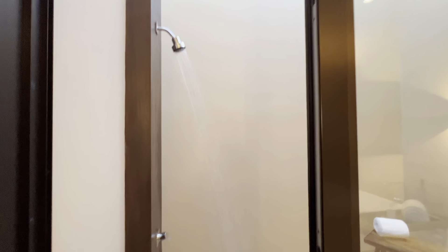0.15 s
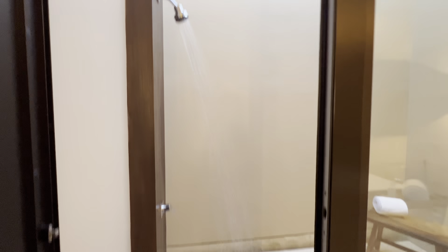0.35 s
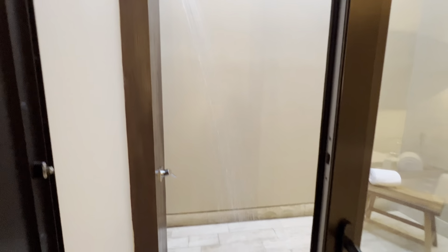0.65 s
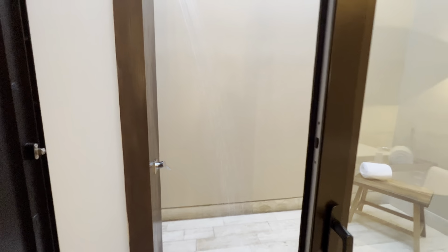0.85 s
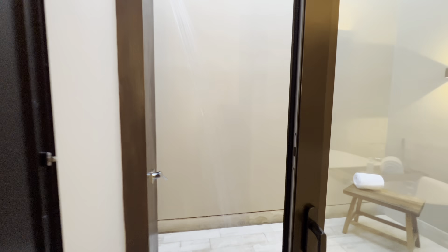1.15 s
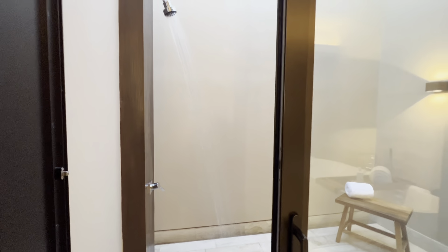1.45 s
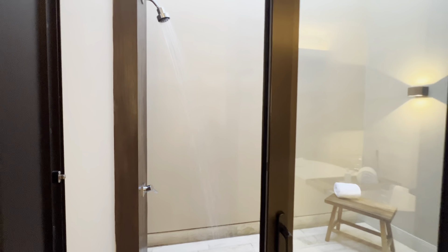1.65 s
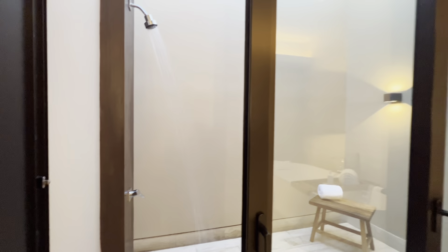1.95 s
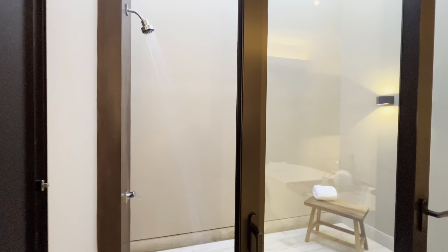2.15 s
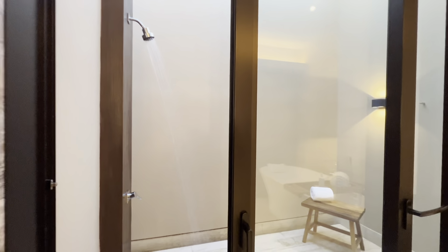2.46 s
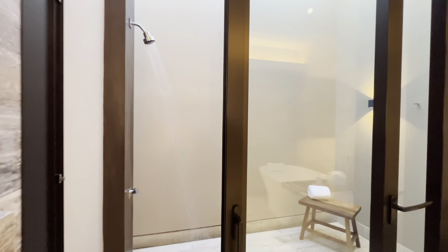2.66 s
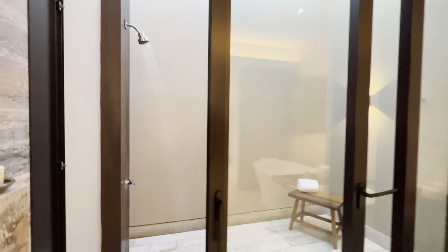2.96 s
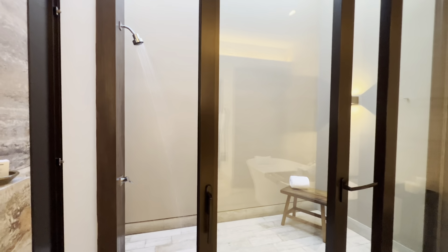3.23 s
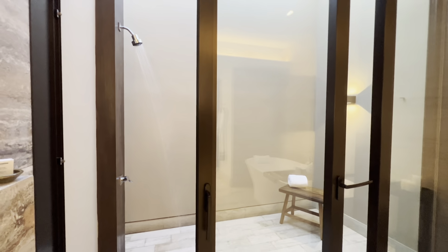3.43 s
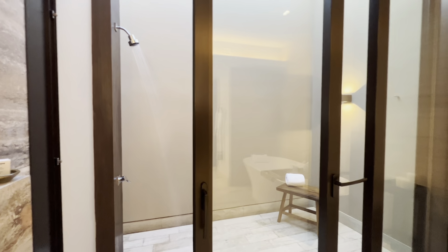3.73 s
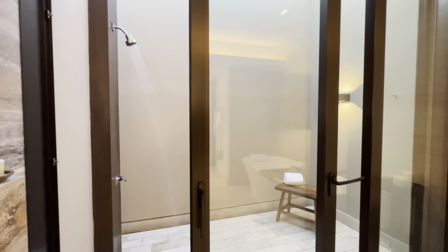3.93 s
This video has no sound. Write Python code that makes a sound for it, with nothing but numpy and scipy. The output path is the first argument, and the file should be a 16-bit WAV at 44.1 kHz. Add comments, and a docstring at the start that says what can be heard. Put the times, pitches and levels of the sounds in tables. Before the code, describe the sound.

A wall-mounted shower runs throughout about four seconds, already spraying at the start and still going at the end. Its hiss is bright and grainy, strongest in the upper range, with countless tiny rising ticks of drops on the stone floor. From about 0.3 to 1.3 s heavier slugs of water land thickly, each a short wet slap with a burst of scattering droplets. A fuller, lower splat comes near 1.6 s, a loose group falls around 1.9-2.2 s, then only isolated ones follow, with several more from 3.2 s to the end. Smaller splashes fall at random. The hiss gently swells and ebbs, dips near 3.4 s and then wavers unsteadily. Hard cubicle walls add a short, bright smear. Underneath, a soft, deep ventilation rumble hums steadily. A small stereo microphone hears it all from the doorway, with wide, diffuse water and a nearly central rumble.

```python
"""A wall shower sprays onto a stone floor in a glass cubicle, heard from the doorway by two microphone ports.
From the start, shaped noise makes the spray's hiss and short rising sines its drops, over a ventilation rumble.
Heavier slugs of water splat thickly for the first 1.3 s, then further apart: each a slap and a noise burst.
The hiss swells and ebbs, unsteadily after 3.4 s; lesser slugs fall at random, and the walls smear drops and slugs.
"""
import sys
import numpy as np
from scipy import signal
from scipy.fft import rfft, irfft
from scipy.io import wavfile
from scipy.ndimage import uniform_filter1d

SR = 44100
rng = np.random.default_rng(int(sys.argv[2]) if len(sys.argv) > 2 else 0)


def dump_mix(stems):
    """Bounce the given channels to the path in sys.argv[1] as a 16-bit WAV at rate SR."""
    frames = np.atleast_2d(stems).T  # one column per channel
    limited = np.clip(frames, -1, 1)  # hard clip at full scale
    pcm = np.round(limited * 32767).astype(np.int16)
    wavfile.write(sys.argv[1], SR, pcm)


N = 180353  # length in samples


def gain_of(db):
    """Decibels to amplitude gain."""
    return 10 ** (np.asarray(db) / 20)


def evened(x):
    """Scales to rms 1."""
    return x / np.sqrt(np.mean(x ** 2) + 1e-20)


def read(table, hz):
    """Columns of a spectrum table, interpolated on a log-frequency axis."""
    table_hz, *columns = np.transpose(table)
    return np.array([np.interp(np.log(hz + 1), np.log(table_hz + 1), column) for column in columns])


def shaped(x, field_db, size):
    """Filters a sound over time: a dB field of Hz and seconds weights its short-time spectra."""
    overlap = size * 3 // 4
    hz, t, spectra = signal.stft(x, SR, nperseg=size, noverlap=overlap)
    spectra = spectra * gain_of(field_db(hz[:, None], t))
    return signal.istft(spectra, SR, nperseg=size, noverlap=overlap)[1][..., :x.shape[-1]]


def vent():
    """Ventilation rumble: low air noise through duct resonances; paired() makes its bottom nearly common."""
    # colour of the rumble: (frequency [Hz], level [dB])
    rumble_colour = [(20, -32), (32, -29), (48, -17), (60, -1), (70, -1.5), (97, -3.5), (141, -4.5),
                     (203, -7), (241, -7), (299, -10.5), (600, -15.5), (800, -18), (1300, -90)]
    # duct resonances: (frequency [Hz], width [Hz], boost [dB])
    duct_rings = [(68, 9, 4), (71.6, 9, 4.5), (139.14, 5.6, 5.5), (244, 19, 1.1)]
    # course of the rumble: (time [s], level [dB], tilt [dB per octave])
    air_flow = [(0.0, -42, -0.8), (2.1, -42.4, -0.4), (3.2, -42.5, 1.5), (4.09, -44, 1.8)]
    s, level_db, tilt_db = np.transpose(air_flow)

    def field_db(hz, t):
        rings_db = sum(db / (1 + (2 * (hz - f) / width) ** 2) for f, width, db in duct_rings)
        octaves = np.log2(np.clip(hz, 110, 400) / 150)  # the tilt pivots at 150 Hz
        slope_db = octaves * np.interp(t, s, tilt_db)
        flow_db = np.interp(t, s, level_db) - level_db.mean()
        return read(rumble_colour, hz[:, 0]).T + rings_db + slope_db + flow_db

    air = evened(shaped(rng.standard_normal((2, N)), field_db, size=4096))
    return air * gain_of(level_db.mean())


def walls(x, direct_db):
    """Cubicle walls: direct sound plus a decaying tail of sparse random echoes, drawn anew per channel."""
    # decay of the tail: (frequency [Hz], time to fall 60 dB [s])
    wall_decay = [(1000, 0.097), (4000, 0.36), (12000, 0.033)]
    taps = np.zeros((2, 8000))
    at = np.arange(60, 7980, 20) + rng.integers(0, 20, (2, 396))  # one echo in every 20 samples
    np.put_along_axis(taps, at, rng.choice([-1., 1.], at.shape), 1)
    tail = shaped(taps, lambda hz, t: -60 * t / read(wall_decay, hz[:, 0]).T, size=256)
    tail = tail / np.linalg.norm(tail[0])
    tail[:, 0] += gain_of(direct_db)  # direct sound against a left tail of unit energy
    return signal.fftconvolve(x, tail, axes=1)[:, :N]


def splats():
    """Slugs landing: a slap rings for a few cycles as droplets scatter in a band of decaying noise."""
    # heavier slugs: (time [s], level before walls and water colour [dB], centre [Hz])
    heavy_slugs = [(0.3214, -17, 4200), (0.3482, -18.5, 4200), (0.4215, -16.5, 3220), (0.4644, -27, 4800),
                   (0.5587, -13.5, 3260), (0.6046, -22.5, 7200), (0.6685, -15.5, 3970), (0.7056, -24, 5200),
                   (0.7937, -15.5, 4000), (1.0825, -17, 4500), (1.1933, -21.5, 4940), (1.2376, -20.5, 3700),
                   (1.2746, -17.5, 4100), (1.3162, -18.5, 4200), (1.6343, -13.5, 2750), (1.6979, -25, 4800),
                   (1.9388, -25, 6460), (1.9823, -22, 4420), (2.0868, -19, 4040), (2.1107, -17, 4100),
                   (2.209, -21.5, 5900), (2.4769, -32.5, 4870), (2.7158, -21.5, 6470), (3.2007, -21, 4000),
                   (3.4347, -24, 5130), (3.6097, -19.5, 5170), (3.8049, -18.5, 5000), (3.9944, -23, 4360)]
    scatter_t60_s, scatter_octaves = 0.058, 0.52  # decay and bandwidth (sigma) of the droplets
    small_count, small_db, small_spread_db = 14, -30, 7.5  # lesser slugs, level plus or minus spread
    small_low_hz, small_high_hz = 4200, 7160
    slap_peak_s = .0003

    when, size, pitch = rng.random((small_count, 3)).T
    small_level_db = small_db + small_spread_db * (2 * size - 1)
    small_hz = small_low_hz * (small_high_hz / small_low_hz) ** pitch
    small_slugs = zip(when * N / SR, small_level_db, small_hz)

    out, t = np.zeros((2, N + 8000)), np.arange(8000) / SR
    hz = np.fft.rfftfreq(8000, 1 / SR)
    slap_envelope = t / slap_peak_s * np.exp(1 - t / slap_peak_s)
    for s, db, centre_hz in [*heavy_slugs, *small_slugs]:
        burst = rng.standard_normal((2, 8000)) * gain_of(-60 * t / scatter_t60_s)
        band = np.exp(-.5 * (np.log2(hz / centre_hz + 1e-9) / scatter_octaves) ** 2)
        droplets = irfft(rfft(burst) * band)
        slap = np.sin(2 * np.pi * 1.15 * centre_hz * t) * slap_envelope
        at = round(s * SR)
        out[:, at:at + 8000] += gain_of(db) * (droplets + .55 * slap)
    return walls(out, direct_db=3.5)


def drops(per_s, spread_db, turns):
    """Ticks of a few cycles, pitch rising as the cavity closes; a few are large."""
    landed = rng.random(N) < per_s / SR
    size = gain_of(spread_db * np.minimum(rng.exponential(1, N), 3.6)) * landed
    kind, t, out = rng.integers(0, 24, N), np.arange(400) / SR, np.zeros(N)
    for k, hz in enumerate(np.geomspace(1600, 14000, 24)):  # starting pitches
        cycles = hz * t
        ring = np.sin(2 * np.pi * cycles * (1 + 0.011 * cycles))
        tick = ring * cycles * np.exp(-2 * cycles / turns)
        tick = tick / np.linalg.norm(tick) * hz ** 0.53  # higher ticks carry more energy
        out += signal.oaconvolve(size * (kind == k), tick)[:N]
    return evened(out)


def spray():
    """Hiss and drops follow the flow, with drifting patches and gusts shared by all bands that follow."""
    # flow of the spray: (time [s], level before water colour [dB])
    flow = [(0.0, -26), (0.7, -28), (1.0, -28), (1.42, -26.5), (1.54, -28.5), (1.64, -25.5), (1.92, -28.5),
            (2.12, -27), (2.36, -28.5), (2.73, -27.5), (3.42, -31), (3.44, -29), (3.51, -27), (3.72, -30),
            (3.8, -26.5), (4.01, -29), (4.04, -26), (4.09, -27.5)]
    # slow drift of the hiss colour: (time [s], extra top treble [dB], extra lower hiss [dB])
    colour_drift = [(0, 3.5, 2), (.8, 3, 2), (2.5, 0, 0.5), (2.9, -0.5, -0.5), (3.4, 1.5, 2.5),
                    (4.09, -1.5, -1.5)]
    s, level_db = np.transpose(flow)
    when, bright_db, body_db = np.transpose(colour_drift)

    def field_db(hz, t):
        patches = rng.standard_normal((2, len(hz), len(t)))
        patches = uniform_filter1d(patches, size=5, axis=1)  # across frequency
        patches = evened(uniform_filter1d(patches, size=18, axis=2))  # across time
        gusts = evened(uniform_filter1d(rng.standard_normal(len(t)), size=14))
        follows = np.clip(np.log2(hz / 1200 + 1e-9) / 0.19, 0, 1)  # the low wash is far and steady
        swing_db = np.interp(t, s, level_db) - level_db.mean() + 0.67 * gusts + 0.98 * patches
        top = np.clip(np.log2(hz / 8000 + 1e-9), 0, 1)
        body = np.exp(-np.log2(hz / 2800 + 1e-9) ** 2 / 0.16)
        colour_db = top * np.interp(t, when, bright_db) + body * np.interp(t, when, body_db)
        return level_db.mean() + follows * swing_db + colour_db

    ticks = drops(per_s=1500., spread_db=4.0, turns=4.)
    ticks = walls(ticks[None], direct_db=-8.5)
    hiss = rng.standard_normal((2, N))
    water = hiss + gain_of(-5.5) * evened(ticks)
    return shaped(water, field_db, size=256)


def paired(x):
    """Sets likeness, phase and level of the right channel against the left, frequency by frequency."""
    # likeness and phase of the right channel against the left: (frequency [Hz], likeness [0-1], phase [turns])
    # the top treble is common to both, opposite in polarity around 13.1-14.4 kHz
    channel_likeness = [(60, .98, 0), (140, .9, 0), (300, .6, 0), (650, .1, -.3), (1300, .35, -.52),
                        (2100, .3, -.95), (4000, .2, -2.1), (6300, .22, -2.1), (8100, .1, -2.4),
                        (9400, .15, -1.63), (10300, .4, -1.5), (11200, .55, -1.12), (11800, 1, -1),
                        (12850, .97, -1), (13250, 1, -.5), (14250, 1, -.5), (14550, .8, -.06),
                        (15300, 1, 0)]
    # right channel, shaded by the body of the device: (frequency [Hz], level [dB])
    right_shade = [(60, -1.2), (140, -3), (300, -.3), (400, -.5), (900, -4.5), (1400, -2.5), (2200, .5),
                   (3500, -2), (4700, -5.5), (5700, -8.5), (7500, -5), (9000, 2), (10700, 0), (16000, 0)]
    hz = np.fft.rfftfreq(N + 1, 1 / SR)
    left, right = rfft(x, N + 1)
    same, turns = read(channel_likeness, hz)
    common = same * left * np.exp(2j * np.pi * turns)
    right = common + np.sqrt(1 - same ** 2) * right
    right = right * gain_of(read(right_shade, hz)[0])
    return irfft(np.array([left, right]))[:, :N]


def scene():
    """Spray and splats, given the water's colour, over the rumble."""
    # colour of the water at the left port: (frequency [Hz], level [dB])
    water_colour = [(300, -17), (600, -12.5), (890, -3.5), (1100, -6), (1400, -9.5), (1800, -16),
                    (2300, -15.5), (2800, -12.5), (3500, -13), (4700, -6), (5700, 0), (7500, 1),
                    (8800, -0.5), (10300, -4.5), (11500, -5), (13000, -10), (15000, -8.5)]
    water = spray() + splats()
    colour = gain_of(read(water_colour, np.fft.rfftfreq(N + 1, 1 / SR)))
    coloured = irfft(rfft(water, N + 1) * colour)[:, :N]
    return coloured + vent()


def record(dry):
    """The paired channels, then a steep low-pass as the band limit."""
    edge_hz = 15750
    low_pass = signal.firwin(1023, edge_hz, window=("kaiser", 9), fs=SR)
    return signal.oaconvolve(paired(dry), low_pass[None], "same")


dry = scene()
out = record(dry)
dump_mix(out)
```